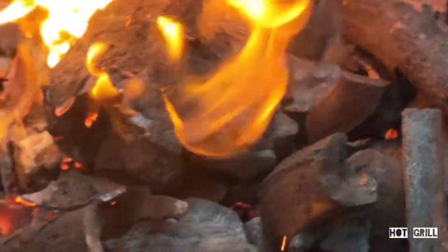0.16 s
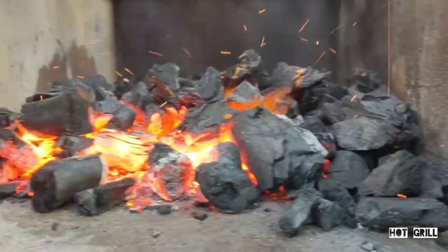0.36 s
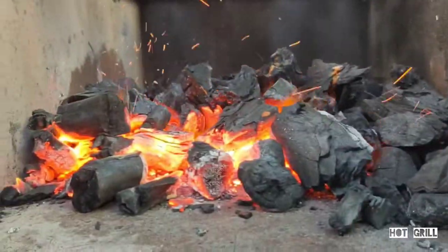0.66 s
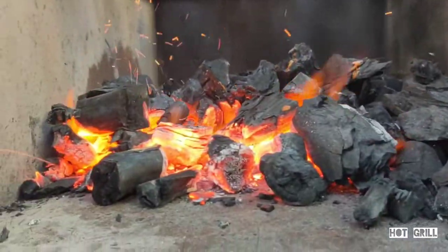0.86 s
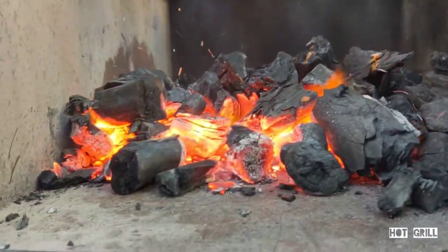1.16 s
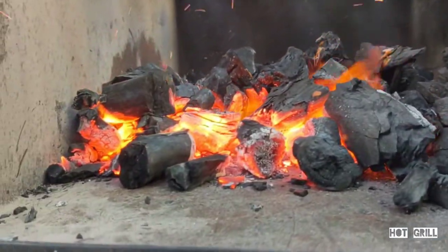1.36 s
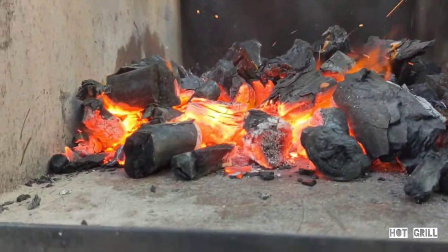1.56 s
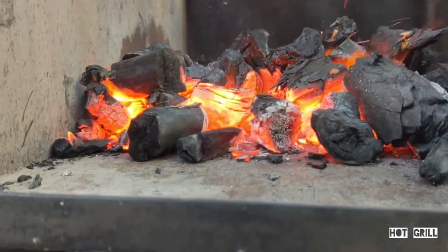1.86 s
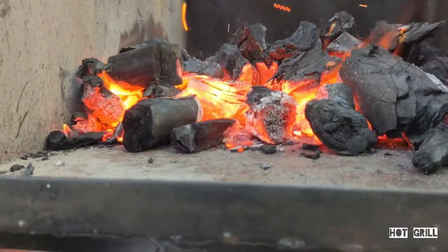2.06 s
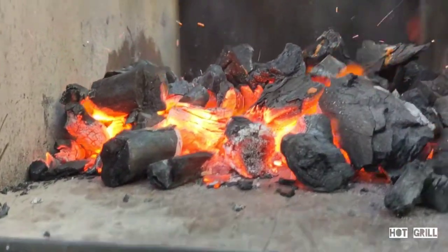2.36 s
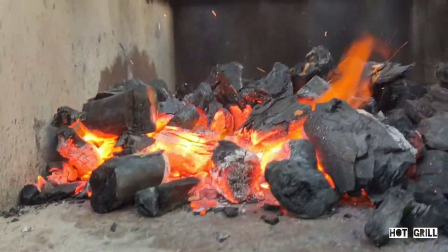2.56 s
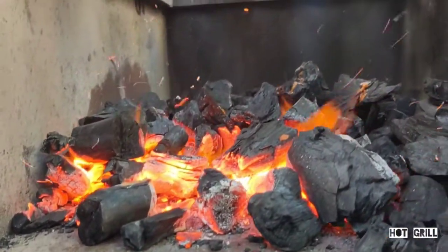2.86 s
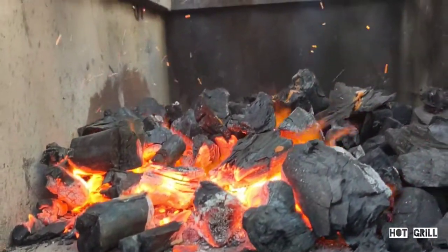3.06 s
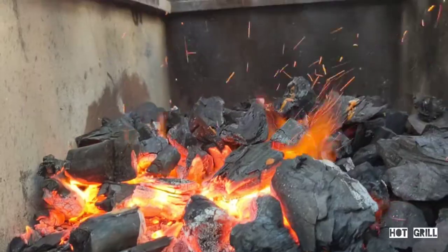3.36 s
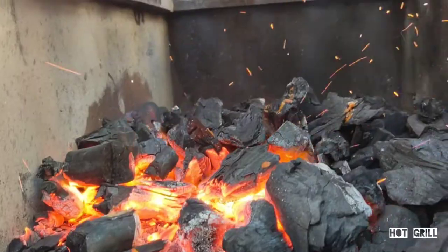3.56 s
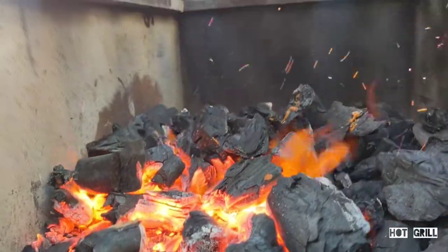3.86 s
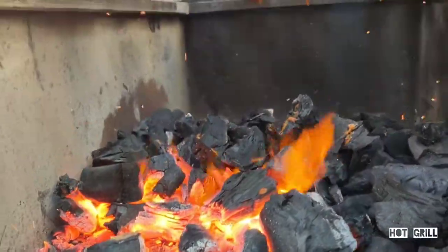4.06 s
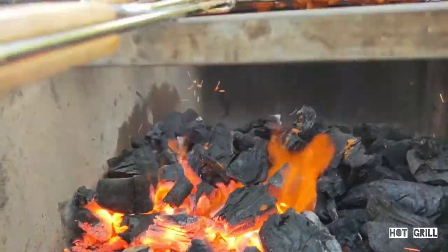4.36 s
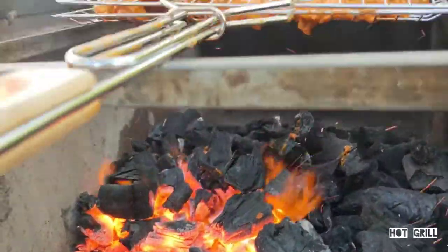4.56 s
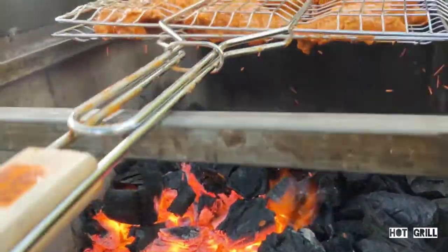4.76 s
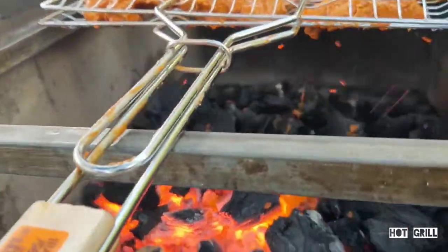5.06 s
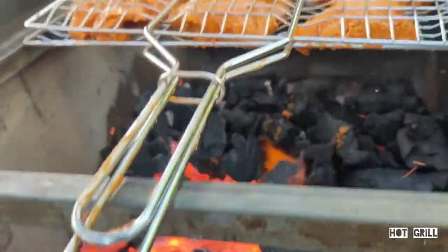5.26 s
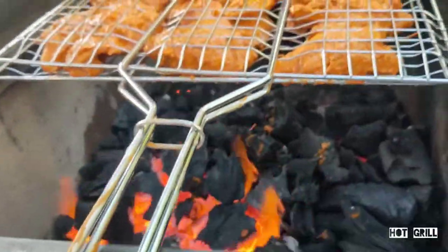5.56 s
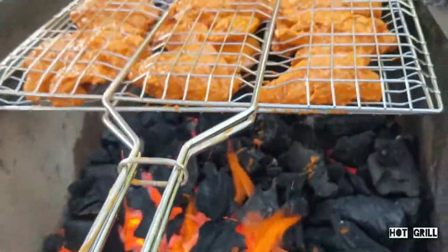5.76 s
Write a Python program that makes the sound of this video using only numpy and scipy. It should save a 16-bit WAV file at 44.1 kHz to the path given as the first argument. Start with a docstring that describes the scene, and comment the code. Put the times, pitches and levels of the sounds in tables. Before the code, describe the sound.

Burning charcoal crackles and snaps sharply over a low fluttering rumble of flames and a steady rush of embers.

```python
"""Open masonry grill, charcoal burning: a short close-up, a moment of silence, then the whole fire bed.
Draught and flames rumble, gas pockets ignite, air rushes through sizzling embers. Lumps split with dry
snaps that echo off the grill wall. Late on: a few dull bumps; far off, a hum, whine, whistle and hoot.
The right channel is a muffled copy of the left, briefly clear as the fire bed comes in."""
import sys
import numpy as np
from scipy import signal
from scipy.fft import rfft, irfft
from scipy.io import wavfile
from scipy.ndimage import uniform_filter1d

SR = 44100
rng = np.random.default_rng(int(sys.argv[2]) if len(sys.argv) > 2 else 0)


def wav_out(sig):
    """Save sig, one row per channel (or a flat mono array), as 16-bit PCM at SR to the path in sys.argv[1]."""
    wavfile.write(sys.argv[1], SR, np.round(np.clip(np.atleast_2d(sig).T, -1, 1) * 32767).astype(np.int16))


N = 261175
TIME_S = np.arange(N) / SR

# flames, sinking as the microphone rises: (time [s], rumble [dB], flutter [dB])
FLAME_LEVELS = [(0.6, -26.5, -33), (0.9, -27.5, -26), (1.5, -26.5, -27), (1.95, -23, -27.5),
                (2.5, -27, -28.5), (2.85, -27.5, -23.5), (3.55, -26, -27), (4.2, -31, -31),
                (4.36, -39, -37.5), (5.08, -41, -34), (5.42, -33, -28.5), (5.6, -43.5, -35.5),
                (5.9, -38, -27.5)]
# flame spectra: (frequency [Hz], gain [dB])
RUMBLE_SPECTRUM = [(20, -36), (30, -26), (45, -9), (70, -1), (120, 1.5), (160, 1.5), (200, -4.5),
                   (280, -21.5), (500, -76), (2000, -100)]
FLUTTER_SPECTRUM = [(60, -55.5), (140, -15), (190, 0.5), (240, -0.5), (310, -4.5), (420, -11), (520, -17.5),
                    (650, -19.5), (1000, -38), (5000, -100)]
# gas puffs: (peak time [s], level [dB], centre [Hz], half-length [s])
PUFFS = [(0.765, -19.5, 115, .018), (0.955, -23, 207, .03), (1.269, -24.5, 199, .016),
         (1.402, -22.5, 198, .022), (1.835, -20.5, 136, .028), (2.012, -22.5, 190, .02),
         (2.201, -20, 104.5, .032), (2.817, -20.5, 202, .018), (3.209, -17.5, 116, .018),
         (3.305, -20.5, 188, .018), (3.364, -20.5, 115, .018), (3.61, -19, 95, 0.0193),
         (3.853, -20, 150, .014), (3.941, -19.5, 240, 0.012), (4.249, -15.5, 190, .011)]

# splitting lumps: (time [s], knock [dB], crack [dB], grit [dB], tick [dB])
SNAPS = [(0.129, -46, -40, -48, -39), (0.7963, -16, -21.5, -52, -43.5), (0.938, -20, -37.5, -73, -60.5),
         (1.346, -44, -45, -91, -58), (1.481, -57, -46, -73, -50), (1.5711, -49.5, -50.5, -70, -48),
         (1.7556, -26.5, -31, -60.5, -44), (1.805, -34, -39, -67, -49.5), (2.0144, -40, -44, -73, -49),
         (2.048, -35, -37.5, -69.5, -42.5), (2.3485, -16.5, -24.5, -73, -44.5),
         (2.518, -24.5, -28, -57, -38), (2.707, -28.5, -32.5, -61.5, -61), (2.7325, -35, -39.5, -65, -43),
         (2.9371, -18, -22.5, -49.5, -46), (2.9535, -48, -47, -58, -40.5), (3.091, -27, -35, -65, -44.5),
         (3.355, -27.5, -31.5, -54.5, -43), (3.401, -32.5, -43.5, -60, -46.5),
         (3.502, -36.5, -46.5, -74, -52.5), (3.8795, -28.5, -34.5, -63, -65),
         (3.967, -15.5, -25, -53.5, -50.5), (4.2525, -18, -27.5, -45.5, -34), (4.2986, -19, -32, -56, -52),
         (4.4617, -43, -46, -68, -53), (4.66, -20.5, -32, -51, -38), (5.004, -36, -47.5, -73, -56),
         (5.1936, -45, -59, -74, -45.5), (5.248, -34.5, -53, -68, -54), (5.53, -29, -34.5, -56.5, -77),
         (5.8132, -20.5, -33, -43.5, -28.5)]
# mean flake: (knock [dB], crack [dB], grit [dB], tick [dB])
FLAKE_DB = (-48.5, -51.5, -81, -53.5)
# fracture spectra: (frequency [Hz], gain [dB])
KNOCK_SPECTRUM = [(50, -42.5), (120, -28), (300, -8), (480, -3), (600, 0.5), (710, -11.5), (890, 4),
                  (1100, -3), (1320, -2.5), (1600, -17), (2200, -43), (4000, -66.5)]
CRACK_SPECTRUM = [(600, -46.5), (1400, -9.5), (1700, 9), (2050, 5), (2400, 2), (2900, -1.5), (3200, -7.5),
                  (3700, -26), (4500, -47.5), (7000, -63), (15000, -82)]
GRIT_SPECTRUM = [(2000, -44), (3800, 7), (4500, 1), (5700, -3.5), (7000, -15.5), (8500, -3), (9500, 1.5),
                 (12000, -25.5), (16000, -45.5)]
TICK_SPECTRUM = [(3000, -62.5), (7000, -41.5), (8500, -25), (11000, -13.5), (13000, -3), (15200, 1),
                 (16300, -11)]
# wall echo, sooner as the microphone moves in: (time [s], delay [s])
WALL_ECHO = [(0.8, 0.0026), (2.0, 0.0024), (2.9, 0.002335), (4.0, .00218), (5.8, 0.002)]

# ember bed: (time [s], rush [dB], sizzle [dB])
EMBER_LEVELS = [(0.57, -42, -71), (0.75, -36.5, -64.5), (1.05, -39.5, -62.5), (1.6, -38.5, -61),
                (2.1, -35.5, -61), (2.4, -38.5, -62.8), (2.75, -37, -61), (3.05, -39, -63),
                (3.85, -39, -65.5), (4.3, -37, -64), (5.9, -37, -64.5)]
# ember spectra: (frequency [Hz], gain [dB])
RUSH_SPECTRUM = [(80, -51), (220, -19), (400, 5.5), (620, 1.5), (720, -1.5), (900, 1.5), (1100, -3.5),
                 (1350, -7.5), (2000, -13), (2800, -21.5), (3400, -27.5), (4200, -40), (7000, -66),
                 (12000, -68)]
SIZZLE_SPECTRUM = [(2500, -49.5), (4500, -21.5), (5500, -23), (7000, -30.5), (8500, -15.5), (11000, -11.5),
                   (13000, -4), (15400, -0.5), (15850, -2.5), (16150, -24.5)]

# close fire: (time [s], jet [dB], sizzle [dB])
CLOSE_LEVELS = [(0, -38, -58), (0.05, -37, -56), (0.1, -31, -57.5), (0.14, -42, -51.5), (0.19, -29, -59.5),
                (0.23, -28, -56.5), (0.26, -33.5, -58.5), (0.28, -39.5, -62.5)]
# close fire spectra: (frequency [Hz], gain [dB])
CLOSE_JET_SPECTRUM = [(100, -56.5), (430, -10), (600, -0.5), (820, 1.5), (1020, 2), (1280, -13),
                      (1500, -3.5), (1750, -15), (2000, -4), (2500, -17), (3250, -15), (3900, -34),
                      (5000, -46.5), (12000, -83.5)]
CLOSE_SIZZLE_SPECTRUM = [(3000, -28), (5000, -12.5), (6500, -4.5), (9000, -9), (11000, -9.5), (13000, -4.5),
                         (15300, -9), (16500, -7.5)]
CLOSE_FLAME_SPECTRUM = [(18, -81.5), (30, -56), (156, -13), (169, -20), (231, -4.5), (309, -15.5),
                        (339, -19.5), (480, -29), (620, -47), (1060, -120)]

# dull bumps: (start [s], length [s], thud [dB], centre [Hz], rustle [dB])
BUMPS = [(3.727, 0.048, -20.5, 200, -38.5), (3.789, .016, -18, 340, -46), (5.247, 0.063, -19.5, 191, -31.5),
         (5.401, 0.083, -32, 300, -37.5), (5.813, .065, -20, 280, -33), (5.886, 0.042, -24.5, 376, -32.5)]
# far hum, whine, whistle, hoot:
# (start [s], length [s], pitch [Hz], glide [fraction of pitch], level [dB], rise [s], fade [dB])
FAR_TONES = [(3.92, 1.38, 69.74, -0.0058, -31, .13, -17.5), (4.48, 0.56, 1633, -0.067, -40.5, 0.066, -11),
             (5.1, 0.34, 1069, 0.0071, -38, 0.14, -10), (5.648, 0.12, 408, 0.0013, -22.5, 0.013, -15.5)]
# whine partials: (frequency [ratio to pitch], gain [dB])
WHINE_PARTIALS = [(.735, -3.5), (1, 2.5), (1.055, -1), (1.11, -19), (1.165, -5.5)]

# right-channel passbands, alternating in polarity: (low edge [Hz], high edge [Hz], gain [dB])
MUFFLE_LOBES = [(-200, 482, 0), (590, 1040, -5.8), (1205, 1440, -12), (1790, 2335, -25), (2400, 2700, -32)]
# unmuffled part of the right channel: (time [s], share [0..1])
CLEAR_SHARE = [(.35, 0), (.45, 1), (.93, 1), (1.04, .3), (1.12, 0)]

CLOSE_END_S, FIRE_START_S, FADE_IN_S, FADE_POWER = 0.294, 0.48, 0.12, 2.93
RUMBLE_FLICKER_DB, FLUTTER_FLICKER_DB, FLICKER_HZ = 1.1, 0.95, 4.4
FLAKES_PER_S, FLAKE_SPREAD_DB = 1.2, 2
LOW_CUT_HZ, HIGH_CUT_HZ = 32, 16400


def flames():
    """Deep draught buffeting plus flame flutter, each flickering at random."""
    rumble_db, flutter_db = curves(FLAME_LEVELS)
    rumble = gain_of(rumble_db + RUMBLE_FLICKER_DB * drift(FLICKER_HZ))
    rumble *= turbulence(RUMBLE_SPECTRUM, eddy_db=2.0, eddy_hz=43)
    flutter = gain_of(flutter_db + FLUTTER_FLICKER_DB * drift(FLICKER_HZ))
    flutter *= turbulence(FLUTTER_SPECTRUM, eddy_db=1.5, eddy_hz=35)
    return gain_of(-1.5) * rumble + gain_of(-2.5) * flutter


def puffs():
    """Gas pockets ignite with a soft low thud."""
    out = np.zeros(N)
    for peak_s, level_db, centre_hz, half_s in PUFFS:
        gas = thud(centre_hz, 2 * half_s)
        add(out, peak_s - half_s, gain_of(level_db) * gas * np.hanning(len(gas)))
    return out


def snaps():
    """Timed large splits plus faint random flakes."""
    out = np.zeros(N)
    for time_s, *levels_db in SNAPS:
        add(out, time_s, snap(time_s, *levels_db))
    flaking = (rng.random(N) < FLAKES_PER_S / SR) & (TIME_S > FIRE_START_S + FADE_IN_S)
    for time_s in TIME_S[flaking]:
        levels_db = np.array(FLAKE_DB) + FLAKE_SPREAD_DB * rng.standard_normal(len(FLAKE_DB))
        add(out, time_s, snap(time_s, *levels_db))
    return out


def snap(time_s, knock_db, crack_db, grit_db, tick_db):
    """One lump splits: hollow knock, dry crack, grit spray, bright tick."""
    echo_s = np.interp(time_s, *np.transpose(WALL_ECHO))
    tearing_t60_s = np.interp(knock_db, [-45, -25], [0.009, 0.022])  # large splits tear longer
    knock = fracture(KNOCK_SPECTRUM, echo_s, echo_gain=0.47, scatter_db=-5, scatter_t60_s=0.036,
                     tail_db=-15.5, tail_t60_s=0.2, uneven_db=1.5)
    crack = fracture(CRACK_SPECTRUM, echo_s, echo_gain=0.14, scatter_db=-2, scatter_t60_s=0.026,
                     tail_db=-15.5, tail_t60_s=0.27, uneven_db=2.5)
    grit = fracture(GRIT_SPECTRUM, echo_s, echo_gain=0.35, scatter_db=9, scatter_t60_s=0.022,
                    tail_db=-2.5, tail_t60_s=0.2, uneven_db=3.5)
    tick = fracture(TICK_SPECTRUM, echo_s, echo_gain=0.31, scatter_db=4, scatter_t60_s=tearing_t60_s,
                    tail_db=-11, tail_t60_s=0.15, uneven_db=4.5)
    return gain_of([knock_db, crack_db, grit_db, tick_db]) @ np.array([knock, crack, grit, tick])


def fracture(spectrum, echo_s, echo_gain, scatter_db, scatter_t60_s, tail_db, tail_t60_s, uneven_db):
    """Pulse, wall echo, scatter among the lumps, short grill tail; rms 1 over the first 10 ms."""
    age_s = np.arange(SR // 3) / SR
    pulse = np.zeros(len(age_s))
    for level_db, t60_s in (scatter_db, scatter_t60_s), (tail_db, tail_t60_s):
        reflections = rng.standard_normal(len(age_s)) * gain_of(-60 * age_s / t60_s)
        pulse += gain_of(level_db) * reflections / np.linalg.norm(reflections)
    pulse *= np.minimum(age_s / 0.00071, 1)
    pulse[0] += 1  # direct path
    add(pulse, echo_s, np.array([echo_gain]))
    lump_spectrum = [(hz, db + uneven_db * rng.standard_normal()) for hz, db in spectrum]
    sound = colour(pulse, lump_spectrum)
    return sound / np.sqrt(np.mean(sound[:SR // 100] ** 2))


def embers():
    """Air rushes through the glowing bed; fine fractures sizzle, sparks spit."""
    rush_db, sizzle_db = curves(EMBER_LEVELS)
    rush = turbulence(RUSH_SPECTRUM, eddy_db=2.27, eddy_hz=7.4)
    rush += gain_of(-10.5) * crackle(RUSH_SPECTRUM, per_s=120, spread_db=1.5)
    sizzle = gain_of(-0.7) * turbulence(SIZZLE_SPECTRUM, eddy_db=1.0, eddy_hz=14)
    sizzle += gain_of(-10.5) * crackle(TICK_SPECTRUM, per_s=140, spread_db=3.0)
    sparks = gain_of(-11) * crackle(TICK_SPECTRUM, per_s=19, spread_db=3.5)
    return gain_of(rush_db) * rush + gain_of(sizzle_db) * (sizzle + sparks)


def close_fire():
    """Hollow flame note, gas jetting between lumps, dense sizzle."""
    jet_db, sizzle_db = curves(CLOSE_LEVELS)
    flame = gain_of(-34) * turbulence(CLOSE_FLAME_SPECTRUM, eddy_db=-1.0, eddy_hz=54)
    jet = gain_of(jet_db + 1.1) * turbulence(CLOSE_JET_SPECTRUM, eddy_db=1.0, eddy_hz=90)
    sizzle = gain_of(sizzle_db + 2.2) * crackle(CLOSE_SIZZLE_SPECTRUM, per_s=1000, spread_db=-0.5)
    return flame + jet + sizzle


def turbulence(spectrum, eddy_db, eddy_hz):
    """Rushing gas: coloured noise in eddies, levelled over the longer run."""
    gas = colour(rng.standard_normal(N), spectrum) * gain_of(eddy_db * drift(eddy_hz))
    return gas / np.sqrt(uniform_filter1d(gas ** 2, size=7000) + 1e-20)


def crackle(spectrum, per_s, spread_db):
    """Tiny fractures of random time and size, each with a short scatter; rms 1."""
    sizes = gain_of(spread_db * np.minimum(rng.exponential(1, N), 4.5))
    signs = rng.choice([-1, 1], N)
    clicks = sizes * signs * (rng.random(N) < per_s / SR)
    scatter_power = signal.lfilter([1], [1, -np.exp(-1 / (0.00042 * SR))], clicks ** 2)
    scatter = 0.14 * np.sqrt(scatter_power + 1e-20) * rng.standard_normal(N)
    return unit_rms(colour(clicks + scatter, spectrum))


def bumps():
    """Thud and rustle start together, hold briefly, stop."""
    out = np.zeros(N)
    for start_s, length_s, thud_db, centre_hz, rustle_db in BUMPS:
        low = gain_of(thud_db) * thud(centre_hz, length_s)
        noise = colour(rng.standard_normal(SR // 4), RUSH_SPECTRUM)
        rustle = gain_of(rustle_db) * unit_rms(noise[-len(low):])
        add(out, start_s, (low + rustle) * signal.windows.tukey(len(low), 0.5))
    return out


def thud(hz, length_s):
    """Low noise around one broad resonance; rms 1."""
    spectrum = [(hz / 6, -44), (hz / 2, -9), (hz, 0), (hz * 2, -16),
                (hz * 5, -35), (hz * 10, -58), (hz * 20, -95)]
    noise = colour(rng.standard_normal(SR // 4), spectrum)
    return unit_rms(noise[-round(length_s * SR):])


def far_tones():
    """Rough sinking whine, low hum, faint whistle, one short hoot."""
    hum, whine, whistle, hoot = FAR_TONES
    out = sum(gain_of(db) * far_tone(whine, waver=0.012, rough=0.85, ratio=ratio)
              for ratio, db in WHINE_PARTIALS)
    out += far_tone(hum, waver=0.0095, rough=0)
    out += far_tone(whistle, waver=0.013, rough=0.43)
    return out + far_tone(hoot, waver=0.018, rough=0.17)


def far_tone(row, waver, rough, ratio=1):
    """Gliding, wavering tone; scattered paths blur the power share `rough` into narrow noise."""
    start_s, length_s, pitch_hz, glide, level_db, rise_s, fade_db = row
    progress = np.clip((TIME_S - start_s) / length_s, 0, 1)
    hz = ratio * pitch_hz * (1 + glide * progress) * (1 + waver * drift(37.3))
    carrier = np.exp(2j * np.pi * np.cumsum(hz) / SR)
    gate = np.clip((TIME_S - start_s) / rise_s, 0, 1) * (progress < 1)
    envelope = gain_of(level_db + fade_db * progress) * uniform_filter1d(gate, size=800)
    paths = np.sqrt(2 * (1 - rough)) + np.sqrt(rough) * (drift(45) + 1j * drift(45))
    return envelope * (paths * carrier).real


def colour(x, spectrum, size=8192):
    """Minimum-phase filter, spectrum joined on a log-frequency axis; no ring before an attack."""
    points_hz, points_db = np.transpose(spectrum)
    bins_hz = abs(np.fft.fftfreq(size, 1 / SR))
    bins_db = np.interp(np.log(bins_hz + 1), np.log(points_hz + 1), points_db)
    log_response = np.conj(signal.hilbert(np.log(gain_of(bins_db))))
    taps = np.fft.ifft(np.exp(log_response)).real[:size // 2]
    return signal.oaconvolve(x, taps)[:len(x)]


def drift(rate_hz):
    """Noise low-passed at rate_hz; rms 1."""
    hz = np.fft.rfftfreq(N, 1 / SR)
    return unit_rms(irfft(rfft(rng.standard_normal(N)) / (1 + (hz / rate_hz) ** 4), N))


def curves(rows):
    """Columns of a timed table, per sample."""
    times_s, *columns = np.transpose(rows)
    return [np.interp(TIME_S, times_s, column) for column in columns]


def add(mix, start_s, sound):
    """Mixes in place from start_s."""
    part = mix[max(round(start_s * SR), 0):][:len(sound)]
    part += sound[:len(part)]


def gain_of(db):
    """dB to amplitude."""
    return 10 ** (np.asarray(db) / 20)


def unit_rms(x):
    """Scales to rms 1."""
    return x / np.sqrt(np.mean(x ** 2) + 1e-20)


def scene():
    """Close fire stops dead; after a silence the whole bed fades in."""
    close = close_fire() * (TIME_S < CLOSE_END_S)
    fade_in = np.clip((TIME_S - FIRE_START_S) / FADE_IN_S, 0, 1) ** FADE_POWER
    bed = fade_in * (flames() + embers())
    mix = close + bed + puffs() + bumps() + far_tones() + snaps()
    return np.array([mix, mix])


def record(dry):
    """Low cut; right channel muffled to bass and weak upper lobes, briefly clear; high cut."""
    low_cut = signal.butter(2, LOW_CUT_HZ, "highpass", fs=SR, output="sos")
    left, right = signal.sosfilt(low_cut, dry)
    hz = np.fft.rfftfreq(N, 1 / SR)
    response = gain_of(-33)  # broadband leak
    for k, (low_hz, high_hz, db) in enumerate(MUFFLE_LOBES):
        band = (np.tanh((hz - low_hz) / 50) - np.tanh((hz - high_hz) / 50)) / 2
        response = response + (-1) ** k * gain_of(db) * band
    muffled = irfft(rfft(right) * response, N)
    clear, = curves(CLEAR_SHARE)
    stereo = np.array([left, clear * right + (1 - clear) * muffled])
    high_cut = signal.firwin(301, HIGH_CUT_HZ, window=("kaiser", 9), fs=SR)
    return signal.oaconvolve(stereo, high_cut[None], "same")


dry = scene()
out = record(dry)
wav_out(out)
```